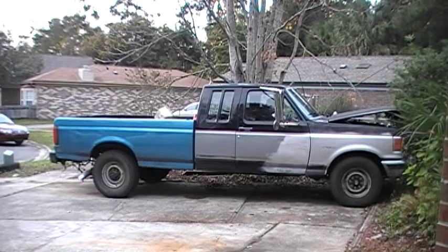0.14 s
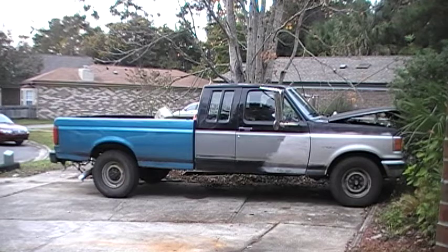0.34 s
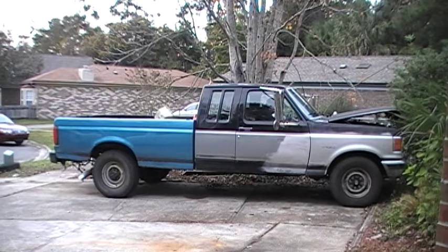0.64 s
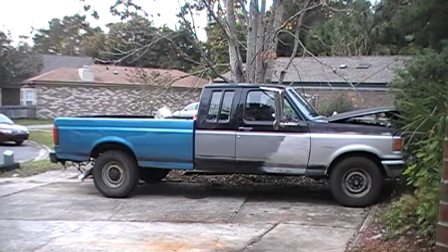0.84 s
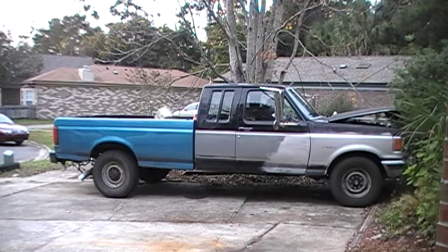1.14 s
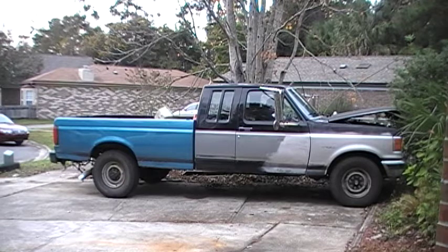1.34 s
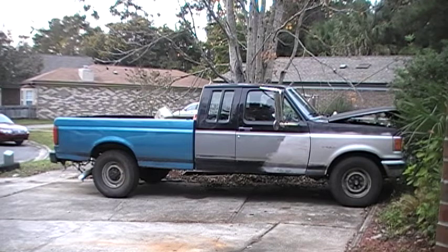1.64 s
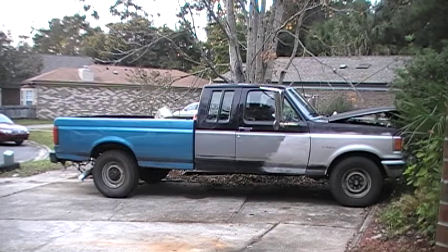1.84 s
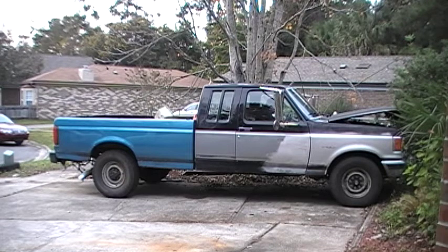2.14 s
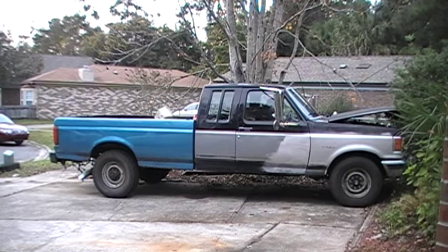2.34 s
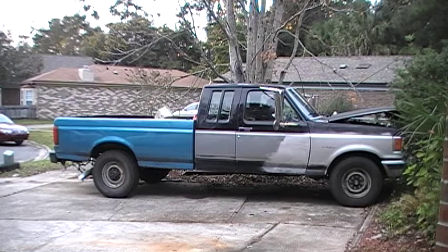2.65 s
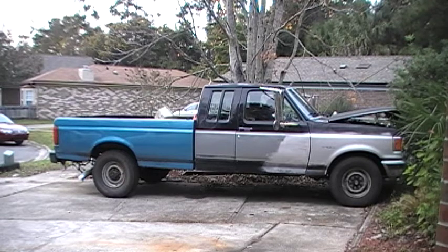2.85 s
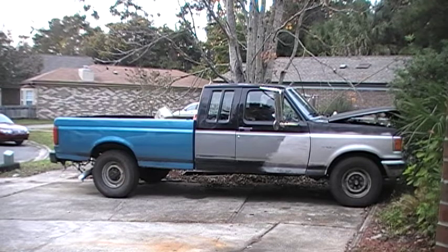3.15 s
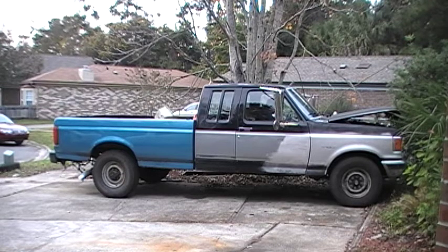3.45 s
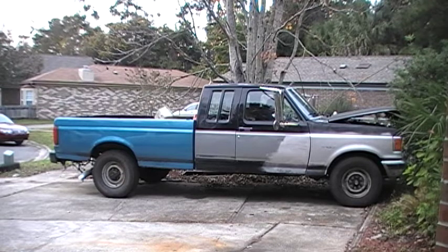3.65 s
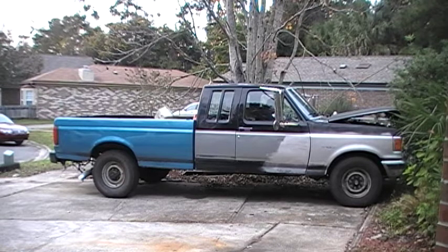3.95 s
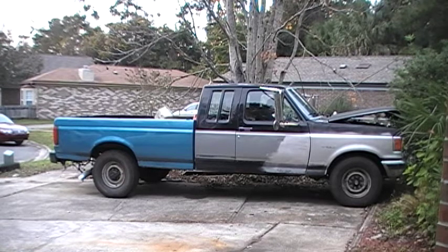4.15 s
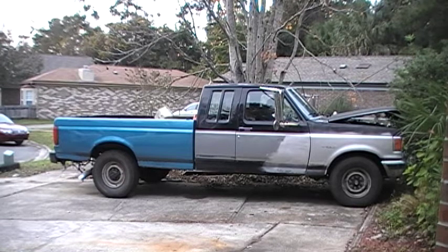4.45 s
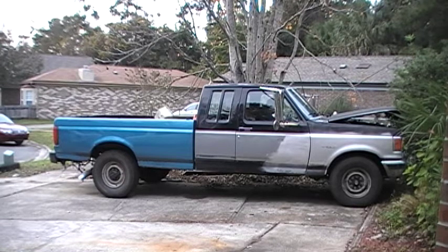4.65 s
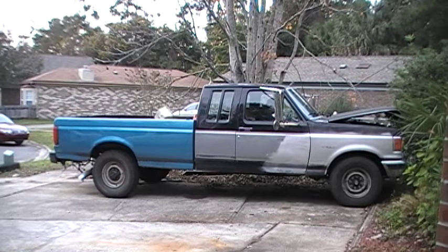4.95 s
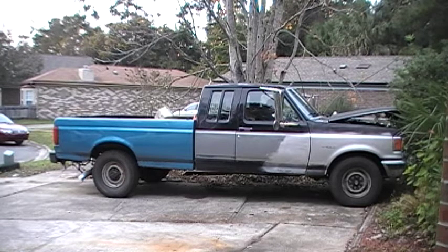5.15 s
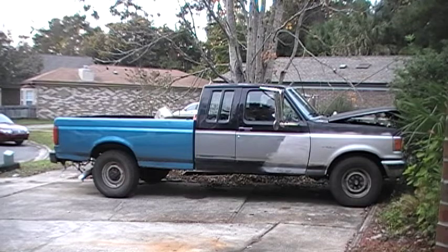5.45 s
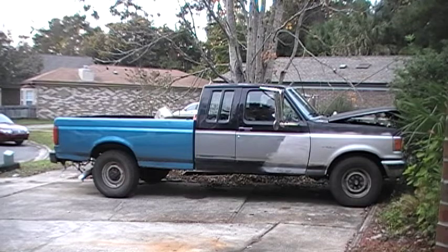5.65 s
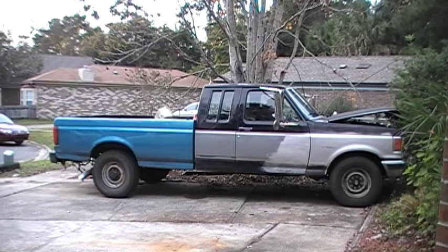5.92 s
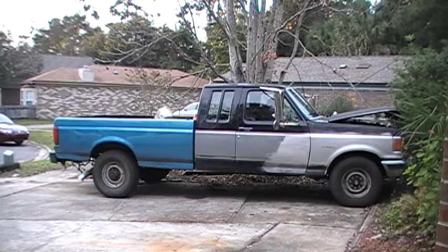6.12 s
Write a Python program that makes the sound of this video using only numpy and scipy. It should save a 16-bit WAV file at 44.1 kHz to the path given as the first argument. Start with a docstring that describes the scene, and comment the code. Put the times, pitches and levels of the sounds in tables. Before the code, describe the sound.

Outdoors on a concrete driveway, a starter motor cranks a big cold diesel engine that never fires. Harsh gear grinding and whining pulse about nine times a second, sagging into each compression and springing ahead, with uneven beats repeating in a limping pattern. Bright metallic chatter fills the gaps. The microphone is some metres away, with short reflections from the ground and walls and a faint outdoor hush.

```python
"""Cold diesel cranking without firing

A starter motor cranks a cold V8 diesel that never fires, some metres away on a driveway.
The flywheel slows into each compression and springs ahead, about nine times a second, so the gear whine slides.
Eight unequal cylinders repeat the same limping pattern with every engine cycle.
Loaded teeth grind as shaped noise and ring the housing as wavering tones; the unloaded drive rattles as
bright noise. Short scattered echoes stand for ground and house walls, over faint steady outdoor noise."""
import sys
import numpy as np
from scipy import signal
from scipy.fft import rfft, irfft
from scipy.io import wavfile

SR = 44100
rng = np.random.default_rng(int(sys.argv[2]) if len(sys.argv) > 2 else 0)


def digitize_waveform(pressure):
    """Quantize a signal to 16-bit integers and store it at the path in sys.argv[1].

    Rows of a 2-D input are taken as channels; values are limited to [-1, 1].
    """
    field = np.atleast_2d(pressure).T
    bounded = np.clip(field, -1, 1)
    quanta = np.round(bounded * 32767).astype(np.int16)
    wavfile.write(sys.argv[1], SR, quanta)


N = 276948  # length in samples

# The course of one stroke, in eight even steps from top dead centre (piston at its highest).
# Each row: speed change as a share (before each cylinder's own factor), then relative levels
# of tooth load in dB, rasp in dB and rattle in dB.
STROKE_COURSE = [(-.02, -5.4, -2.7, -0.3), (.18, -1.4, -1.3, 1.9), (.2, -0.2, -0.6, 3),
                 (.085, 0.5, -0.5, 2.9), (-.015, 0.1, 1.8, 0.3), (-.1, -0.3, 1.9, -0.8),
                 (-.185, -1.6, 1, -1.3), (-.18, -2, 0.6, -1.6)]
TEETH = 152  # on the ring gear around the flywheel


def gain_of(db):
    """Turns decibels into an amplitude factor."""
    return 10 ** (np.asarray(db) / 20)


def evened(x):
    """Scales a signal to an average strength (rms) of 1."""
    return x / np.sqrt(np.mean(x ** 2) + 1e-20)


def read(points, hz):
    """Reads a spectrum table between its points, on a log-frequency axis."""
    f, value = np.transpose(points)
    return np.interp(np.log(hz + 1), np.log(f + 1), value)


def colour(x, points, modes=(), size=8192):
    """Filters with a smooth spectrum plus resonant peaks, without sounding ahead of the input."""
    hz = abs(np.fft.fftfreq(size, 1 / SR))
    peaks_db = sum(lift / (1 + (2 * (hz - f) / width) ** 2) for f, width, lift in modes)
    db = read(points, hz) + peaks_db
    # the Hilbert transform supplies the minimum phase that belongs to these levels
    response = np.exp(np.conj(signal.hilbert(np.log(gain_of(db)))))
    impulse = np.fft.ifft(response).real[:size // 2]
    return signal.oaconvolve(x, impulse)[:len(x)]


def wander(rate_hz):
    """Smooth random drift of rms 1, fading out above about the given rate."""
    hz = np.fft.rfftfreq(N, 1 / SR)
    spectrum = rfft(rng.standard_normal(N)) * np.exp(-(hz / rate_hz) ** 2)
    return evened(irfft(spectrum, N))


def cyclic(values, turns):
    """Reads a repeating table smoothly; one turn is one pass through it."""
    fine = signal.resample(np.asarray(values, float), len(values) * 20)
    return np.interp(turns, np.arange(len(fine)) / len(fine), fine, period=1)


def by_cylinder(table, stroke):
    """Reads columns in firing order, gliding from the middle of one stroke to the next."""
    middles = np.arange(len(table)) + .5
    return [np.interp(stroke, middles, column, period=len(table)) for column in np.transpose(table)]


def crank():
    """Counts strokes and gear teeth over time; each cylinder brings its own speed swing and levels."""
    # Start of each engine cycle in seconds; a cycle is two crankshaft turns and eight compressions.
    cycle_starts = [-0.094, 0.805, 1.713, 2.617, 3.525, 4.428, 5.322, 6.212]
    # The cylinders in firing order, whose unequal compression makes the limp.
    # Each row: lateness in seconds, speed swing as a factor, load change at top dead centre in dB,
    # then relative levels of grinding in dB, rasp in dB, rattle in dB and gear hum in dB.
    cylinders = [(0.000, 1.0, 1.8, 0.3, 0.4, -0.6, 2.5), (0.004, 0.95, -2.2, 0.2, -0.3, -0.1, 0),
                 (0.011, 0.95, -1.7, -1, 0.3, 0.7, -2.5), (0.0125, 0.45, -1, 0.5, 0.3, 0.4, -0.5),
                 (0.008, 0.95, 1.2, 0.3, 0.3, 0.6, 2.5), (0.003, 0.85, -3.5, -0.3, -0.6, 0.1, -0.5),
                 (0.000, 0.75, 0, -0.4, 0, 0.8, -3), (-0.001, 0.85, 1.5, -0.1, 0.4, -1, 0.5)]
    count, late_s = len(cylinders), np.transpose(cylinders)[0]
    # one more cycle, as long as the last, closes the timeline
    cycles = np.append(cycle_starts, 2 * cycle_starts[-1] - cycle_starts[-2])
    index = np.arange(count * len(cycle_starts))
    starts = np.interp(index / count, np.arange(len(cycles)), cycles) + late_s[index % count]
    stroke = np.interp(np.arange(N) / SR, starts, index)
    _, depth, _, grind_db, rasp_db, rattle_db, hum_db = by_cylinder(cylinders, stroke)
    swing = cyclic(np.transpose(STROKE_COURSE)[0], stroke) * depth
    speed = 1 + swing - swing.mean() + .012 * wander(45)
    strokes_per_turn = count / 2
    tooth = np.cumsum(speed * np.gradient(stroke)) * TEETH / strokes_per_turn
    # around top dead centre, where trapped air begins to drive the piston,
    # the load on the teeth changes by each cylinder's own amount
    top = np.round(stroke).astype(int)
    nearness = np.exp(-((stroke - top) / 0.13) ** 2)  # width as a share of a stroke
    load_db = np.transpose(cylinders)[2][top % count] * nearness
    return stroke, tooth, (grind_db + load_db, rasp_db + load_db, rattle_db, hum_db + load_db)


def tooth_blows(tooth, wear_db, chance_db):
    """One click a tooth; worn teeth come round again with every turn of the flywheel."""
    at = np.flatnonzero(np.diff(np.floor(tooth)))
    wear = rng.standard_normal(TEETH)[tooth[at].astype(int) % TEETH]
    level_db = wear_db * wear + chance_db * rng.standard_normal(len(at))
    blows = np.zeros(N)
    blows[at] = gain_of(level_db) * rng.choice([-1, 1], len(at))
    return evened(blows)


def scrape(tooth, depth_db, patchy_db):
    """Sliding metal: noise that can throb with each tooth and comes in uneven patches."""
    level_db = depth_db * np.cos(2 * np.pi * tooth) + patchy_db * wander(96)
    return evened(rng.standard_normal(N) * gain_of(level_db))


def gear_hum(stroke, tooth, hum_db):
    """A tone at the tooth rate, which sinks as the flywheel slows into each compression."""
    swell_db = 3.7 * np.cos(2 * np.pi * (stroke - .47))  # loudest at this share of the stroke
    level_db = hum_db + swell_db + 1.3 * wander(14)
    return evened(gain_of(level_db) * np.cos(2 * np.pi * tooth))


def gear_whine(tooth):
    """Overtones of the tooth rate; uneven contact makes them stray in phase and flicker."""
    # Each row: multiple of the tooth rate, relative level in dB.
    overtones = [(2, 1.5), (3, 4), (4, 5), (5, -0.5), (6, 0), (7, 0), (8, -2.5)]
    stray_turns, flicker_db = .14, 3
    whine = 0
    for multiple, db in overtones:
        level = gain_of(db + flicker_db * wander(25.4))
        turns = round(multiple) * tooth + stray_turns * wander(98)
        whine = whine + level * np.cos(2 * np.pi * turns)
    return evened(whine)


def gears(stroke, tooth, grind_db, rasp_db, hum_db):
    """The pinion drives the ring gear: hum, whine, blows and scraping pass through the truck's resonances."""
    # Duller grinding of the tooth flanks, weakest at top dead centre and fullest around mid-stroke.
    # Each row: frequency in Hz, level in dB.
    flank_spectrum = [(200, -3), (280, -4.5), (380, -2), (500, 0.2), (1600, 0.5), (1800, 2.5),
                      (2100, -23.5), (3000, -4), (5000, -0.5)]
    # Brighter rasp of the tooth tips, fullest just past mid-stroke. Each row: frequency in Hz, level in dB.
    tip_spectrum = [(600, -28), (1500, -15), (1800, 3.5), (2000, -1), (2600, -0.3), (3000, -2)]
    # What the truck radiates between its resonances. Each row: frequency in Hz, level in dB.
    radiation = [(40, -60), (150, -32), (215, -28), (270, -28), (550, -20.5), (850, -17.5), (1300, -22),
                 (2300, -10), (3000, -16.5), (3700, -26), (5000, -24), (9000, -32.5), (15000, -58)]
    # Resonances of starter, bell housing and body panels. Each row: frequency in Hz, width in Hz, lift in dB.
    truck_modes = [(281.4, 47.4, 18.5), (336, 27, 18), (425, 42, 14), (702, 24, 11), (760, 30, 7.5),
                   (834, 27, 3.5), (964, 48, 10.5), (1033, 40, 12), (1141, 41, 7), (1200.6, 46, 13),
                   (1318, 60, 15.5), (1390, 41, 11.5), (1446, 34, 11), (1497, 27, 5), (1601, 33, 12),
                   (1669, 57, 7.0), (1771, 93, 3.5), (1910, 50, 7.5), (1974.5, 57, 4), (2004.7, 21.4, 7),
                   (2134, 51, 6.5), (2270, 54, 6.5), (2516, 76, 2.5), (2645, 70, 5.5), (2935, 80, 8.5),
                   (3040, 70, 6), (3112, 30, 10), (3420, 40, 16), (4020, 45, 12)]
    load_db, bite_db = (cyclic(column, stroke) for column in np.transpose(STROKE_COURSE)[1:3])
    hum = gear_hum(stroke, tooth, hum_db)
    whine = gear_whine(tooth)
    blows = tooth_blows(tooth, wear_db=2.5, chance_db=4)
    # both share the whine, but each has its own scraping noise
    flank, tip = (gain_of(1.5) * scrape(tooth, depth_db=0.5, patchy_db=2.3) + gain_of(-7.5) * whine
                  for _ in range(2))
    grind = colour((flank + gain_of(-2.5) * blows) * gain_of(load_db + grind_db), flank_spectrum)
    rasp = colour(tip * gain_of(bite_db + rasp_db), tip_spectrum)
    drive = gain_of(-19) * hum + grind + rasp
    return gain_of(-21.5) * evened(colour(drive, radiation, truck_modes))


def sing(stroke, hz, level_db, waver_hz, peak_share, depth_db):
    """A metal part sings: a wavering tone that swells at one point of each stroke."""
    swell = gain_of(depth_db * np.cos(2 * np.pi * (stroke - peak_share)) + level_db)
    pitch_hz = hz + waver_hz * wander(51.1)
    return evened(swell * np.sin(2 * np.pi * np.cumsum(pitch_hz) / SR))


def housing(stroke):
    """The starter's case and bracket ring as the teeth take up the load, then the bell housing."""
    # How each stroke makes the metal sing, in firing order; all levels are relative.
    # Each row: bell housing level in dB, its note in Hz, its peak as a share of the stroke,
    # starter case level in dB, its peak as a share of the stroke,
    # bracket level in dB, its note in Hz, squeal level in dB.
    singing = [(-2.5, 1020, 0.72, -4, 0.5, 6, 1400, 0), (2, 995, 0.58, 9, 0.45, -4, 1330, 1),
               (-3, 995, 0.65, 2, 0.35, -3, 1330, 4), (8, 978, 0.66, 0, 0.55, 4, 1205, 0),
               (2, 1033, 0.64, 1, 0.32, 4, 1203, 1), (3, 982, 0.52, 5, 0.37, -2, 1320, 1),
               (-6, 1000, 0.65, 0, 0.45, -1, 1325, 3), (10, 982, 0.56, 3, 0.67, -3, 1340, -2)]
    (bell_db, bell_hz, bell_share, case_db, case_share,
     bracket_db, bracket_hz, squeal_db) = by_cylinder(singing, stroke)
    bell = sing(stroke, bell_hz, bell_db + wander(6), waver_hz=11, peak_share=bell_share, depth_db=8.5)
    low = sing(stroke, 730, 2 * wander(7.6), waver_hz=22, peak_share=0.33, depth_db=11)
    case = sing(stroke, 2001, case_db + 2 * wander(6), waver_hz=8.25, peak_share=case_share, depth_db=10)
    bracket = sing(stroke, bracket_hz, bracket_db + 2 * wander(8), waver_hz=14, peak_share=0.35, depth_db=9)
    # late in the stroke the hard-pressed teeth squeal, sinking with the flywheel
    squeal_hz = 2380 * (1 + .4 * cyclic(np.transpose(STROKE_COURSE)[0], stroke))
    squeal = sing(stroke, squeal_hz, squeal_db + 2 * wander(10), waver_hz=44.76, peak_share=0.63, depth_db=9)
    starter = gain_of(-43) * low + gain_of(-34.5) * case + gain_of(-39.5) * bracket
    return gain_of(-32.5) * bell + starter + gain_of(-39.3) * squeal


def yard(x, t60=0.069, size=12000):
    """Short scatter from concrete and walls: sparse random echoes that fall 60 dB in t60 seconds."""
    t = np.arange(size) / SR
    sparse = rng.standard_normal(size) * (rng.random(size) < .1)
    taps = sparse * gain_of(-60 * t / t60) * (t > .001)
    return signal.oaconvolve(x, taps / np.linalg.norm(taps))[:N]


def rattle(stroke, tooth, rattle_db):
    """When the engine runs ahead of the starter, the freewheel slips and the slack drive chatters brightly."""
    # The unloaded drive. Each row: frequency in Hz, level in dB.
    clatter_spectrum = [(200, -34), (1500, -19), (3300, 3), (4900, -5.5), (6500, -4.5), (8900, -2),
                        (9500, -7.5), (10500, -9.5), (11300, -17.5), (12500, -24), (15500, -34.5)]
    # Resonances of its small steel parts. Each row: frequency in Hz, width in Hz, lift in dB.
    drive_modes = [(5260, 130, 3), (6050, 340, 8), (6920, 180, 5.5), (7730, 110, 0), (7920, 240, 2.5),
                   (8300, 210, 4.5), (8830, 150, 1.5), (10430, 250, 2)]
    # The freewheel slipping near top dead centre. Each row: frequency in Hz, level in dB.
    slip_spectrum = [(2000, -39), (5200, -14.5), (5900, 0), (6900, -1), (8000, -6), (11000, -18.5),
                     (15500, -42)]
    blows = tooth_blows(tooth, wear_db=6, chance_db=3.5)
    chatter = scrape(tooth, depth_db=0.0, patchy_db=0.73) + gain_of(-22) * blows
    slack = gain_of(cyclic(np.transpose(STROKE_COURSE)[3], stroke) + rattle_db)
    clatter = gain_of(-29.25) * evened(colour(chatter * slack, clatter_spectrum, drive_modes))
    slip_swell_db = 6 * np.cos(2 * np.pi * (stroke - 0.085))  # loudest at this share of the stroke
    slipping = gain_of(slip_swell_db + rattle_db + 2.3 * wander(5))
    slip_noise = scrape(tooth, depth_db=-2, patchy_db=2.5) * slipping
    slip = gain_of(-37) * evened(colour(slip_noise, slip_spectrum))
    # part of it bounces between the underbody and the concrete
    return clatter + slip + gain_of(-8.5) * yard(clatter + slip, t60=0.055)


def outdoor_noise():
    """Faint steady outdoor noise: a soft broadband hush over a low rumble."""
    # Each row: frequency in Hz, relative level in dB.
    outdoor_spectrum = [(10, -46), (30, -35), (55, -10), (75, -5.5), (105, 4.5), (170, -1), (300, -14),
                        (1000, 1.5), (8000, -27)]
    return gain_of(-54) * evened(colour(rng.standard_normal(N), outdoor_spectrum))


def scene():
    """The cranking truck over faint outdoor noise; scattered sound differs between left and right."""
    # Colour of the sound that differs between the sides. Each row: frequency in Hz, level in dB.
    scatter_spectrum = [(100, -18), (340, -19), (540, -14.5), (1000, -9), (2000, -14), (4000, -8.5),
                        (6000, -10), (8000, -5.5), (10500, -3.5), (13000, -7)]
    # Balance of the two sides. Each row: frequency in Hz, left minus right in dB.
    lean = [(100, 0), (330, -0.3), (500, 0.5), (700, 2.5), (1100, 3.4), (2000, .3), (4000, -0.5), (8000, 0),
            (13000, 0.5)]
    stroke, tooth, (grind_db, rasp_db, rattle_db, hum_db) = crank()
    starter = gears(stroke, tooth, grind_db, rasp_db, hum_db) + housing(stroke)
    # two independent draws: one shared by both sides, one to set them apart
    direct, scattered = (rattle(stroke, tooth, rattle_db) + outdoor_noise() for _ in range(2))
    mid = starter + direct
    side = colour(yard(starter) + scattered, scatter_spectrum)
    channels = []
    for sign in (1, -1):  # left, then right
        balance = [(hz, sign * db / 2) for hz, db in lean]
        channels.append(colour(mid + sign * side, balance))
    return np.array(channels)


def record(dry):
    """Limits the band with a steep low-pass filter that removes the highest treble."""
    lowpass = signal.firwin(511, 15650, window=("kaiser", 9), fs=SR)  # cutoff in Hz
    return signal.oaconvolve(dry, lowpass[None], "same")


dry = scene()
out = record(dry)
digitize_waveform(out)
```